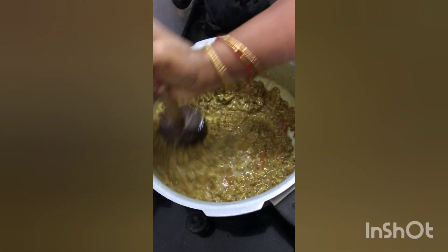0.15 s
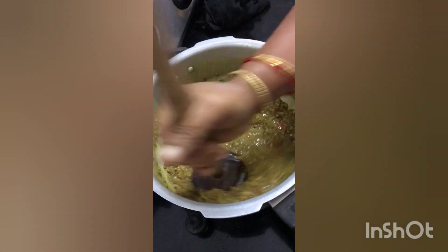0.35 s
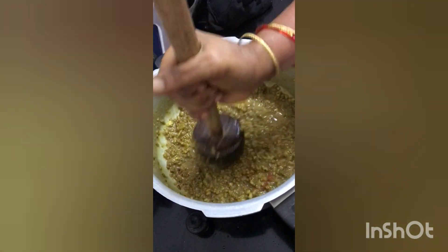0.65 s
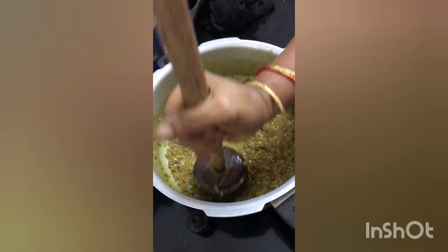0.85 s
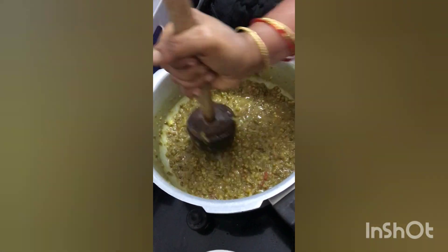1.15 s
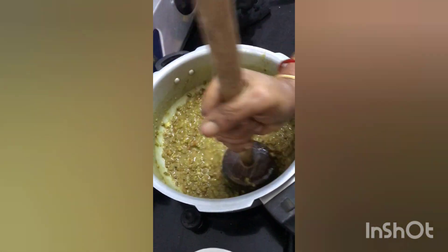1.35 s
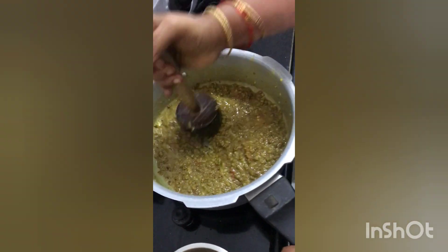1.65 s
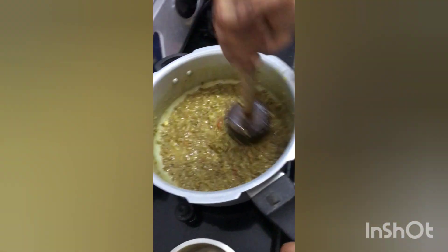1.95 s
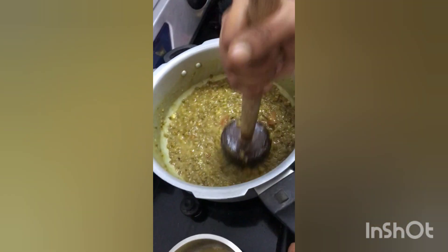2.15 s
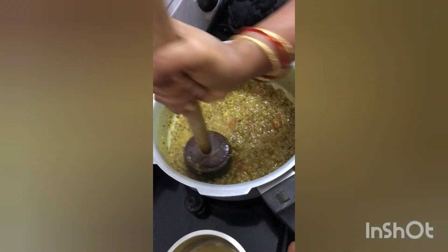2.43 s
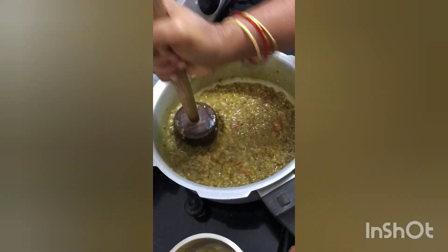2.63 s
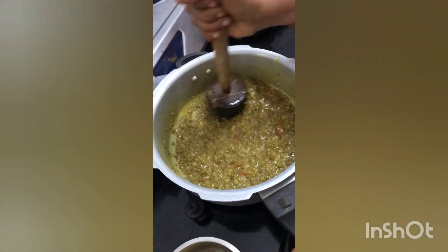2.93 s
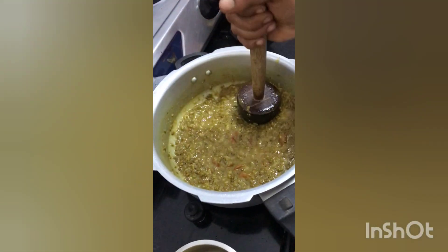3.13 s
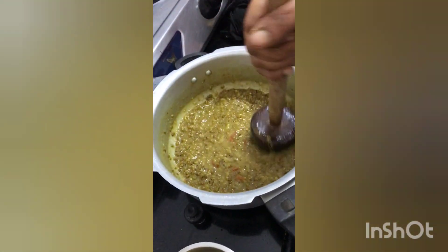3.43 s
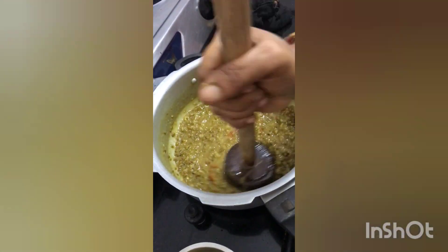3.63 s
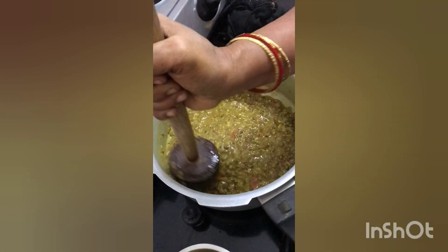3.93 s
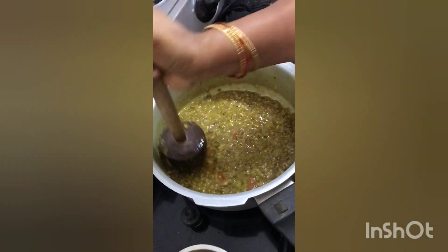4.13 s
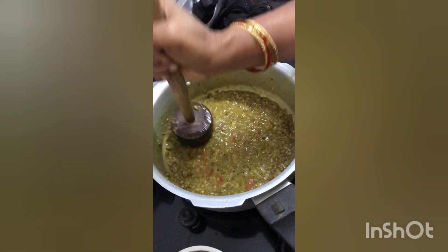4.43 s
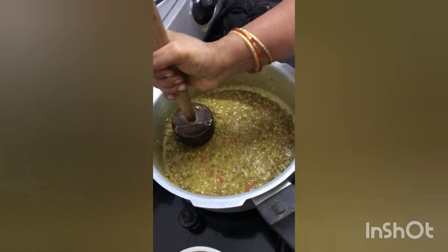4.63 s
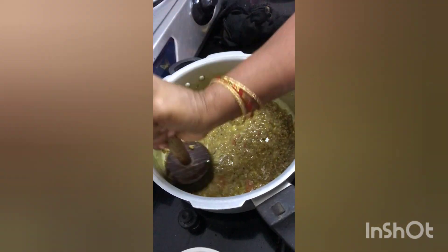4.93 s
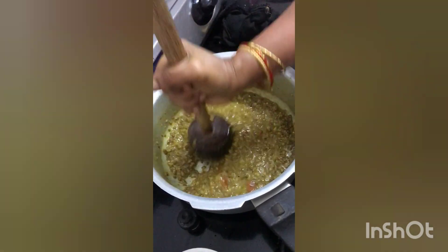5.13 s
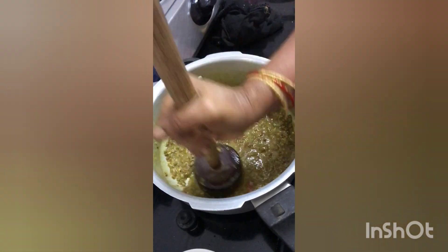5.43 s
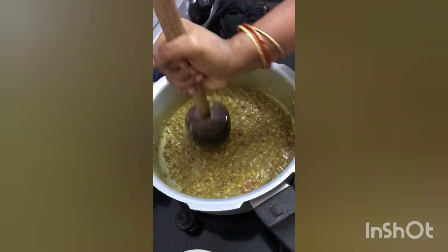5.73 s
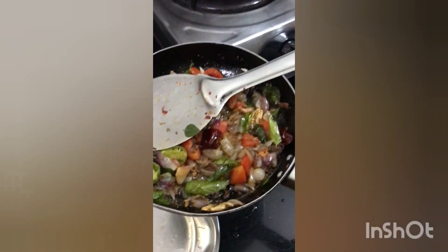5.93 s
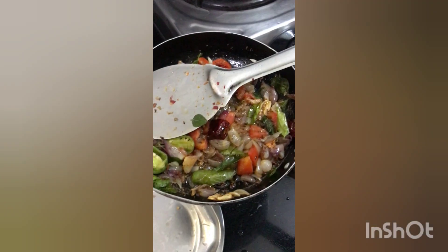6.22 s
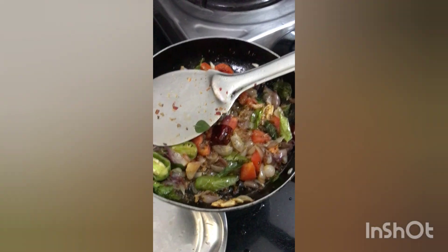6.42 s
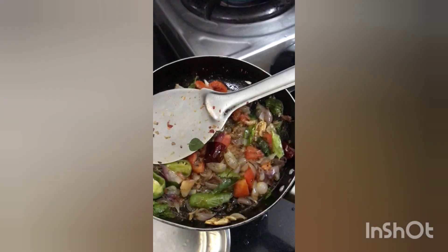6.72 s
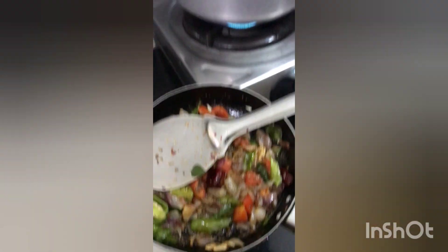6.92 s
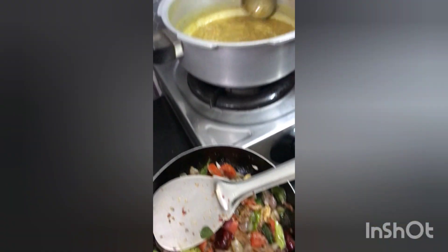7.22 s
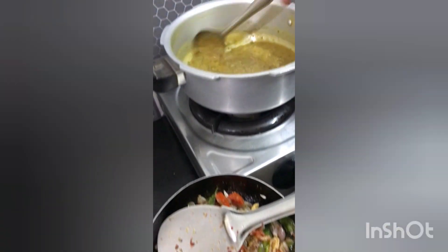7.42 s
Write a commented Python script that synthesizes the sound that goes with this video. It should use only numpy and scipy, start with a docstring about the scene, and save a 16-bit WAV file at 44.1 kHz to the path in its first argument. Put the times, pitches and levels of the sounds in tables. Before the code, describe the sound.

A wooden masher knocks unevenly through wet lentils in a metal cooker, then a steel ladle scrapes and clanks on it.

```python
"""A wooden masher thumps cooked lentils in an aluminium cooker, each blow exciting the metal's damped modes.
Air pockets in the wet mash pop and crackle, glass bangles tink and a fan hums in the tiled kitchen.
After a short silence the kitchen is quieter, with a lit burner: a steel ladle drags twice through
the cooker, rasping and squeaking by stick-slip friction, and clanks on its rim."""
import sys
import numpy as np
from scipy import signal
from scipy.fft import rfft, irfft, next_fast_len
from scipy.io import wavfile
from scipy.ndimage import uniform_filter1d

SR = 44100
rng = np.random.default_rng(int(sys.argv[2]) if len(sys.argv) > 2 else 0)


def transcribe(u):
    """Save the signal u as a 16-bit wav file named by the first command-line argument.

    u: samples, shape (n,) or (channels, n), limited to [-1, 1]; the rate is SR.
    q: integer samples, one column per channel.
    """
    v = np.clip(np.atleast_2d(u).T, -1, 1)
    q = np.round(v * 32767).astype(np.int16)
    wavfile.write(sys.argv[1], SR, q)


N = 333730


def undb(db):
    """Decibels as an amplitude ratio."""
    return 10 ** (np.asarray(db) / 20)


def level(x, db):
    """Scaling to an RMS level."""
    return x * undb(db) / np.sqrt(np.mean(x ** 2))


def peak(x, db):
    """Scaling to a peak level."""
    return x * undb(db) / np.abs(x).max()


def colour(x, points):
    """Spectral shaping by points of frequency_hz, gain_db."""
    size = next_fast_len(len(x))
    hz, db = np.transpose(points)
    bins_hz = np.arange(size // 2 + 1) * SR / size
    gain = undb(np.interp(np.log(bins_hz + 1), np.log(hz), db))
    return irfft(rfft(x, size) * gain, size)[:len(x)]


def cut(x, order, hz, kind):
    """A maximally flat low-pass or high-pass filter."""
    return signal.sosfilt(signal.butter(order, hz, kind, fs=SR, output="sos"), x)


def ring(x, hz, t60):
    """A damped oscillator: one mode, with little skirt far from its pitch."""
    radius = np.exp(-np.log(1000) / (max(t60, .002) * SR))
    angle = 2 * np.pi * hz / SR
    return signal.lfilter([1, 0, -1], [1, -2 * radius * np.cos(angle), radius * radius], x)


def band(x, hz, width_hz):
    """A resonance with gain 1 at its centre."""
    return signal.lfilter(*signal.iirpeak(hz, hz / width_hz, fs=SR), x)


def add(out, start_s, x):
    """Superposition of x from a given time."""
    i = int(start_s * SR)
    out[i:i + len(x)] += x[:N - i]


def walk(rate_hz):
    """Random modulation: held values, smoothed twice."""
    hold = int(SR / rate_hz)
    steps = np.repeat(rng.standard_normal(N // hold + 1), hold)
    return 2.46 * uniform_filter1d(uniform_filter1d(steps, hold), hold)[:N]


def grains(per_s, spread_db):
    """Shot noise: random clicks, many small and a few large."""
    hit = rng.random(N) < per_s / SR
    return hit * rng.standard_normal(N) * undb(spread_db * np.minimum(rng.exponential(size=N), 4))


def struck(peak_db, contact_ms, t60_share, modes, scatter_db, flutter_db):
    """Modal response: a rough force pulse drives modes that each flutter in level."""
    t, flutter_step_s = np.arange(SR // 3) / SR, .012
    force = rng.standard_normal(len(t)) * np.sin(np.pi * np.minimum(1000 * t / max(contact_ms, .1), 1))
    shares = undb(scatter_db * rng.standard_normal(len(modes)))
    knots = np.arange(0, t[-1] + flutter_step_s, flutter_step_s)
    out = np.zeros(len(t))
    for share, (hz, db, t60) in zip(shares, modes):
        flutter = undb(np.interp(t, knots, flutter_db * rng.standard_normal(len(knots))))
        tone = ring(band(force, hz, 1.72 * hz), hz, t60_share * t60)
        out += share * peak(flutter * tone, db)
    return peak(out, peak_db)


def room(x):
    """Reverberation: reflections off tiles build a dense tail that dies sooner in the treble."""
    low_t60_s, high_t60_s, tail_db = 0.47, 0.2, -6
    t = np.arange(SR // 2) / SR
    noise = rng.standard_normal(len(t))
    low = cut(noise, 1, 2500, "low")
    tail = low * undb(-60 * t / low_t60_s) + (noise - low) * undb(-60 * t / high_t60_s)
    tail *= 1 - np.exp(-(t / 0.0016) ** 2)
    return x + undb(tail_db) * signal.fftconvolve(x, tail / np.sqrt(np.sum(tail ** 2)))[:N]


def rumble():
    """Narrow-band noise, heard as a low drone."""
    # noise bands: centre_hz, width_hz, level_db
    bands = [(59, 2.8, -64.5), (93, 6.2, -65)]
    return sum(level(band(rng.standard_normal(N), hz, width), db) for hz, width, db in bands)


def burner():
    """Broadband noise of a kitchen with a lit burner, drifting in level."""
    # noise spectrum: frequency_hz, density_db
    spectrum = [(15, -51), (42, -21), (62, -2.5), (78, 1.5), (95, -8.5), (125, -18.5), (160, -2.5),
                (221, -22), (295, -5), (389, -21), (457, -17.5), (684, -24.5), (919, -18), (2300, -31),
                (3200, -35), (5000, -38), (8000, -39.5), (15500, -38)]
    return level(colour(rng.standard_normal(N), spectrum), -54) * undb(1.5 * walk(2.5))


def fan():
    """Rotation gives wavering harmonics of the shaft rate over the noise of rushing air."""
    # hum: shaft_multiple, level_db
    harmonics = [(6, -4), (7, -6), (9, -9), (10, -3), (11, -10), (12, -11), (13, -6), (16, -3), (17, 0),
                 (18, -3), (28, -11), (33, -12), (36, -14)]
    # air flow: frequency_hz, density_db
    air = [(15, -60), (42, -47), (55, -1.5), (78, -10), (130, -6.5), (200, -8.5), (290, -14.5), (385, -7.5),
           (417, -17), (687, -19.5), (818, -17), (1150, -5), (1450, -19.5), (2500, -16.5), (3250, -50),
           (5500, -120)]
    shaft_hz = 21.2 * (1 + 0.00069 * walk(0.703))
    angle = 2 * np.pi * np.cumsum(shaft_hz) / SR
    hum = sum(undb(db + walk(2.44)) * np.sin(k * angle + rng.uniform(0, 2 * np.pi))
              for k, db in harmonics)
    return level(hum, -56) + level(colour(rng.standard_normal(N), air), -53.5)


def bursts(events, decay_ms):
    """Damped transients: tiny noise bursts, each filtered around its own pitch."""
    out, t = np.zeros(N), np.arange(600) / SR
    for start_s, db, hz in events:
        burst = rng.standard_normal(len(t)) * np.exp(-t * 1000 / decay_ms)
        body = band(band(burst, hz, 0.95 * hz), hz, 0.95 * hz)
        snap = 0.036 * np.diff(burst, prepend=0)
        add(out, start_s, peak(body + snap, db))
    return out


def drips():
    """Small drips tick: impulses too short to carry a clear pitch."""
    # ticks: start_s, level_db, centre_hz
    ticks = [(5.9693, -46, 8650), (6.1, -49, 7300), (6.4537, -47, 9060), (6.6184, -46, 5590),
             (6.6573, -46, 13100), (7.2, -47, 12600), (7.4826, -45, 7500), (7.5103, -43, 6890)]
    return bursts(ticks, decay_ms=0.56)


def bangles():
    """Glass bangles touch and vibrate freely in two close modes."""
    # touches: start_s, level_db, pitch_hz
    touches = [(2.742, -44, 11000), (2.7505, -49, 10200), (3.5788, -44, 10300), (3.981, -45, 10200),
               (4.037, -44, 10200), (5.0434, -30, 10190), (5.047, -41, 6745), (6.69, -43, 11400),
               (6.692, -58, 5300), (6.705, -57, 10200)]
    # glass modes: pitch_ratio, level_db, free_t60_s
    glass = [(1, 0, .36), (1.083, -7, .2)]
    out = np.zeros(N)
    for start_s, db, hz in touches:
        modes = [(ratio * hz, mode_db, t60) for ratio, mode_db, t60 in glass]
        tink = struck(db, contact_ms=0.85, t60_share=.22, modes=modes, scatter_db=2, flutter_db=3)
        add(out, start_s, tink)
    return out


def ladle_drags():
    """Sliding friction: steel slips in uneven grains that hiss and drive the metal's resonances."""
    # grit envelope, one list for each drag: time_s, level_db
    envelopes = [
        [(6.157, -59), (6.162, -46), (6.19, -47.5), (6.25, -48), (6.29, -44), (6.335, -44.5), (6.36, -62),
         (6.46, -76)],
        [(6.69, -89), (6.715, -61), (6.76, -72), (6.768, -62), (6.78, -66), (6.786, -46), (6.84, -42),
         (6.866, -33), (6.87, -54), (6.878, -34.5), (6.93, -39), (7.0, -38), (7.022, -54), (7.14, -87)],
    ]
    # resonances across the base: centre_hz, width_hz, level_db
    base = [(313, 24, 0), (698, 99, -4.5), (1090, 130, -10.5), (2060, 86, -8.5), (2570, 230, -16),
            (3960, 200, -18), (6340, 380, -23)]
    # resonances up the wall: centre_hz, width_hz, level_db
    wall = [(326, 25, 5), (1077, 210, 2.5), (1510, 72, -5), (1745, 32, -3), (2670, 59, -9),
            (3400, 280, -16), (4330, 200, -11.5), (4760, 150, -14), (5750, 440, -9.5), (6520, 360, -13),
            (12150, 300, -31)]
    # grit: frequency_hz, density_db
    grit = [(120, -52), (200, -23), (339, -3), (525, -12.5), (728, -5), (1350, -10), (1810, -12.5),
            (3180, -16.5), (5910, -21.5), (15500, -31)]
    out, t = np.zeros(N), np.arange(N) / SR
    strokes = zip(envelopes, (base, wall), (-4.5, -5.5), (-13.5, -20))
    for envelope, resonances, hiss_db, low_offset_db in strokes:
        times_s, grit_db = np.transpose(envelope)
        low_db = low_offset_db + 0.56 * grit_db  # the rumble in the metal follows the grit
        slip = level(grains(7000, 2.1), 0) * undb(0.96 * walk(150))
        metal = sum(undb(db + 2 * walk(45)) * band(slip, hz, width) for hz, width, db in resonances)
        scrape = level(colour(slip, grit), hiss_db) + level(metal, -1.8)
        for kind, db in (("low", low_db), ("high", grit_db)):
            gain = undb(np.interp(t, times_s, db, left=-120, right=-120))
            out += level(cut(scrape, 3, 3200, kind), -2.14) * gain
    return out


def ladle_squeaks():
    """Stick-slip oscillation: the ladle's edge sings short notes that swell, waver and stop."""
    # squeaks: start_s, length_s, pitch_hz, level_db
    notes = [(6.253, 0.028, 723, -41), (6.287, 0.046, 736.5, -35), (6.845, 0.022, 4320, -32),
             (6.876, 0.009, 2130, -34.5), (6.877, 0.037, 4250, -39), (6.897, 0.037, 4850, -38),
             (6.942, 0.016, 1854, -33), (6.949, 0.0058, 5590, -30.5), (6.956, 0.019, 5800, -35),
             (6.973, 0.025, 1540, -37)]
    out = np.zeros(N)
    for start_s, length_s, hz, db in notes:
        size = int(length_s * SR)
        waver = 1 + 0.018 * uniform_filter1d(rng.standard_normal(size), 60) * np.sqrt(60)
        swell = np.sin(np.pi * np.linspace(0, 1, size) ** 1.6)
        add(out, start_s, undb(db) * swell * np.sin(2 * np.pi * hz * np.cumsum(waver) / SR))
    return out


def ladle_clanks():
    """Brief steel impacts excite the cooker's high modes; the broth makes their ringing flutter."""
    # impacts: start_s, level_db, contact_ms, t60_share
    impacts = [(6.157, -27.5, 1.64, 0.04), (6.711, -45, 0.73, 0.05), (6.8, -32, 0.48, 0.44),
               (6.9505, -30, .5, .04), (6.9995, -24, .3, 0.04), (7.217, -43.5, 1, .05),
               (7.24, -2, .7, 0.18)]
    # modes of the cooker with thin broth: pitch_hz, level_db, free_t60_s
    rim = [(343, -20, 1.2), (1038, -13, 1.1), (1068, -19, .8), (1728, -14, .7), (1762, -7, 1.2),
           (1790, -6, 1.1), (2642, 0, .75), (2590, -9, 0.5), (3052, -20, .9), (3310, -13, 1.1),
           (3400, -15, 0.8), (3784, -13, .7), (4032, -15, .7), (4226, -17, .8), (5900, -19, .8),
           (6395, -17, .7), (6525, -13, 0.8), (9674, -18, .5)]
    # the many short modes of a steel blow: frequency_hz, density_db
    dense_modes = [(300, -30), (900, -9.5), (1500, -15), (2700, -6.5), (4300, -6), (5000, -21), (6000, -5),
                   (6900, -6.5), (7500, -21), (9300, -14), (15500, -31)]
    out, t = np.zeros(N), np.arange(SR // 4) / SR
    for start_s, db, contact_ms, t60_share in impacts:
        clatter = colour(rng.standard_normal(len(t)), dense_modes) * undb(-60 * t / (0.4 * t60_share))
        add(out, start_s, struck(db - 4, contact_ms, t60_share, rim, scatter_db=1, flutter_db=2.5))
        add(out, start_s, peak(clatter, db - 6))
    return out


def mash_fizz():
    """Air pockets resonate by size: a crackle over fine hiss, brighter while the masher only stirs."""
    # pocket resonances: centre_hz, level_db
    pockets = [(3400, -11.5), (5400, -33), (6600, -11), (9000, -14), (13000, -6)]
    # colour of the fizz: frequency_hz, gain_db
    spectrum = [(820, -43), (1400, -22), (1600, 0), (1990, -8), (2590, -6.5), (3230, -1), (4970, -4.5),
                (6080, -1), (7900, -6), (9100, -5), (10600, -8.5), (12900, -4.5), (15500, -9)]
    stir_end_s, stir_fade_s = 1.35, 0.3
    crackle = sum(level(band(grains(300, 2.4), hz, 0.5 * hz), db) * undb(.8 * walk(9))
                  for hz, db in pockets)
    hiss = rng.standard_normal(N) * undb(1.2 * walk(7.5))
    fizz = level(colour(crackle + hiss, spectrum), 0)
    stir = np.clip(1 - (np.arange(N) / SR - stir_end_s) / stir_fade_s, 0, 1)
    treble = band(fizz, 12500, 5000)
    treble_gain = undb(3 * stir + .6 * walk(14))
    return (fizz + (treble_gain - 1) * treble) * undb(-51 + 0.8 * stir)


def mash_pops():
    """Bursting pockets in the wet mash release short pressure pulses."""
    # the loudest pops: start_s, level_db, centre_hz
    pops = [(0.2782, -30, 6310), (0.3865, -41, 6080), (0.4658, -38, 6270), (0.7985, -29, 8640),
            (0.8495, -31.5, 3700), (0.9319, -32, 6200), (0.9862, -38.5, 3300), (1.219, -33, 6200),
            (1.329, -29.5, 9100), (1.575, -26.5, 6200), (1.6145, -32, 5840), (1.8726, -33, 4620),
            (1.9884, -15, 7950), (2.1176, -36, 6940), (2.149, -44, 3040), (2.446, -22.5, 8550),
            (2.7005, -30, 6450), (2.7756, -37, 3500), (2.8275, -34, 7480), (2.853, -35, 7200),
            (2.8714, -33.5, 6650), (2.9385, -31, 4400), (3.2141, -33, 5650), (3.2575, -31.5, 13500),
            (3.5209, -30.5, 6790), (3.676, -29.5, 5700), (3.739, -27.5, 8900), (3.8926, -35, 8550),
            (4.269, -31.5, 5660), (4.351, -35.5, 3410), (4.559, -34, 8100), (4.605, -30, 5800),
            (4.9162, -34.5, 4000), (5.0424, -27, 7960), (5.1627, -34, 5170), (5.4852, -25.5, 6800),
            (5.8063, -35, 3300)]
    return bursts(pops, decay_ms=1.5)


def mash_plops():
    """Bubble resonance: a closing air pocket sings a few cycles that glide upward."""
    # air pockets: start_s, level_db, pitch_hz
    pockets = [(.54, -43, 523), (0.647, -26, 1380), (0.855, -33, 1100), (.878, -33, 577),
               (4.036, -30.5, 1820)]
    out = np.zeros(N)
    for start_s, db, hz in pockets:
        cycles = np.arange(2000) * hz / SR
        envelope = np.exp(-cycles / 2) * np.minimum(cycles, 1)
        add(out, start_s, undb(db) * envelope * np.sin(2 * np.pi * cycles * (1 + 0.019 * cycles)))
    return out


def squelch():
    """A flow tone: air sucked past the masher rises in pitch as the gap narrows."""
    start_s, length_s, level_db = 0.19, 0.089, -51.5
    out, size = np.zeros(N), int(length_s * SR)
    pitch_hz = np.linspace(1007, 1230, size)
    add(out, start_s, undb(level_db) * np.hanning(size) * np.sin(2 * np.pi * np.cumsum(pitch_hz) / SR))
    return out


def masher():
    """Impact excitation: central blows ring the base, edge blows rim and wall; hard ones also crack."""
    # blows: start_s, knock_db, thump_db, place (0 centre to 1 edge), hardness (0 to 1), contact_ms
    blows = [(0.271, -41, -48, 0.36, 0, 34), (1.396, -61, -46, .3, 0.4, 21),
             (2.022, -7.5, -24.5, 0.52, 0.44, 9.4), (2.225, -7.5, -30, 0.18, 1, 6.1),
             (2.445, -18, -24.5, 0.81, 0.45, 3.46), (2.682, -24.5, -28.5, 0.69, 0.36, 9.4),
             (2.809, -29.5, -52, 0.63, 0.44, 20), (2.931, -31.5, -40, 0.37, 0, 7.7),
             (3.071, -36.5, -49, 0.82, 0.86, 19.5), (3.16, -35, -35, 0.41, 0.2, 12),
             (3.268, -29.5, -62, 0.52, 0.43, 16), (3.331, -16, -27.5, 0.59, 0.64, 8.3),
             (3.486, -41, -41, 0.82, 0.86, 8.6), (3.613, -47, -36, 0.51, 0.1, 8.6),
             (3.85, -34.5, -34, 0.83, 0.62, 10.8), (4.136, -34.5, -56, 0.6, 0.56, 22),
             (4.18, -23.5, -39, 0.48, 0.44, 20), (4.372, -22.5, -35.5, 0.5, 0.5, 31),
             (4.437, -16.5, -25.5, 0.87, 0.63, 17.8), (4.521, -21, -27, 0.46, 0.25, 15.2),
             (4.594, -49, -50, 0.59, 0.7, 8.3), (4.738, -20.5, -31, 0.43, 0.61, 15),
             (4.947, -9, -37, 0.71, 0.59, 6)]
    # modes of cooker on worktop, rim, base, wall and upper wall: pitch_hz, level_db, free_t60_s
    parts = [
        [(104, -16, 0.55), (153.4, 13.5, 0.31), (202, -25, 0.23)],
        [(286, -3, 0.45), (303, -4, 0.31), (347, -7.5, 0.15), (405, -4.5, 0.1)],
        [(528, -6, 0.089), (569, -2, 0.17), (676, -13.5, 0.16), (780, -8, 0.14), (864, -6.5, 0.092)],
        [(950, 5, 0.067), (1028, 17.5, 0.12), (1110, 9.5, 0.11), (1240, -3, 0.04)],
        [(1630, -8, 0.051), (1770, 0, 0.07), (2170, 2, 0.022), (2628, 2.5, 0.048), (3570, -1.5, 0.058),
         (5160, -11, 0.027)],
    ]
    # crack of wood on metal: frequency_hz, density_db
    crack_spectrum = [(150, -36), (400, -9.5), (1000, -1.5), (1500, -6), (2500, -11), (5000, -21.5),
                      (9000, -34), (15500, -49)]
    place_db, hardness_db, crack_t60_s = 24, 20, 0.082
    contact_shares = (0.9, 0.883, 1.0, 0.72, 0.46)
    out, t = np.zeros(N), np.arange(SR // 8) / SR
    for start_s, knock_db, thump_db, place, hardness, contact_ms in blows:
        base_db = knock_db - place_db * place
        edge_db = knock_db - place_db * (1 - place)
        rim_db = edge_db - hardness_db * hardness + 10
        wall_db = edge_db - hardness_db * (1 - hardness)
        # weight damps the metal; it rings longer where the edge knock outweighs the thump
        freedom = 0.23 + 0.0347 * max(edge_db - thump_db, 0)
        t60_shares = (0.27,) + (freedom,) * 4  # the worktop rings alike under every blow
        levels_db = (thump_db, rim_db, base_db, wall_db + 10.5, wall_db + 13 + 40 * np.log10(freedom))
        for modes, part_db, contact_share, t60_share in zip(parts, levels_db, contact_shares, t60_shares):
            # the wet mash detunes every mode from blow to blow and makes it flutter
            detuned = [(hz * (1 + .012 * rng.standard_normal()), db, t60) for hz, db, t60 in modes]
            push_ms = contact_share * contact_ms
            add(out, start_s, struck(part_db, push_ms, t60_share, detuned, scatter_db=1.5, flutter_db=5))
        attack = 1 - np.exp(-(t * 2500 / contact_ms) ** 2)
        crack = colour(rng.standard_normal(len(t)), crack_spectrum) * undb(-60 * t / crack_t60_s)
        add(out, start_s, peak(attack * crack, wall_db + 7.5))
    return out


def scene():
    """Superposition of the sources: mashing before a short silence, ladling after it."""
    silence_start_s, silence_end_s, fade_s = 5.897, 5.931, .002
    escape_share = 0.88  # of the pops, leaving the cooker for the room
    t = np.arange(N) / SR
    before = np.clip((silence_start_s - t) / fade_s, 0, 1)
    after = np.clip((t - silence_end_s) / fade_s, 0, 1)
    pops = mash_pops()
    near = masher() + mash_plops() + squelch() + escape_share * pops + drips() + bangles()
    near += ladle_clanks() + ladle_drags() + ladle_squeaks()
    near = cut(near, 3, 75, "high")  # small objects radiate no deep bass
    out = burner() * after
    out += (rumble() + room(near)) * (before + after)
    out += ((1 - escape_share) * pops + mash_fizz() + fan()) * before
    return out[None]


def record(dry):
    """Band limiting: the highest treble drops by a step, then the top is cut off."""
    shelf_hz, top_hz = 15490, 16645
    shelved = signal.sosfilt(signal.ellip(10, .2, 30, shelf_hz, fs=SR, output="sos"), dry)
    return signal.sosfilt(signal.ellip(10, .2, 70, top_hz, fs=SR, output="sos"), shelved)


dry = scene()
out = record(dry)
transcribe(out)
```